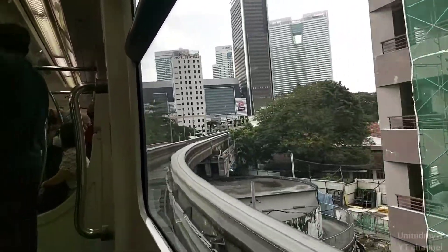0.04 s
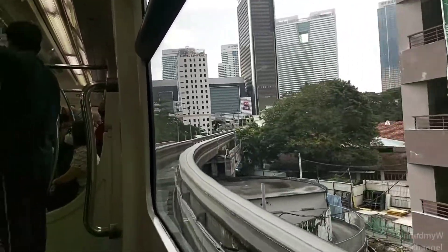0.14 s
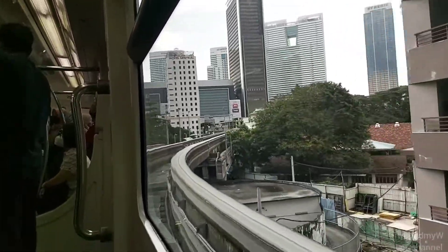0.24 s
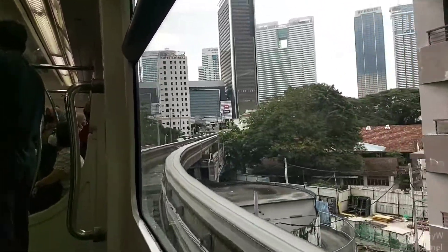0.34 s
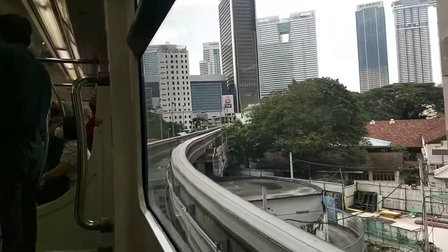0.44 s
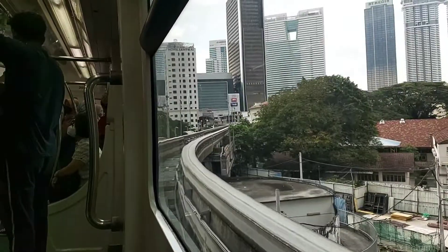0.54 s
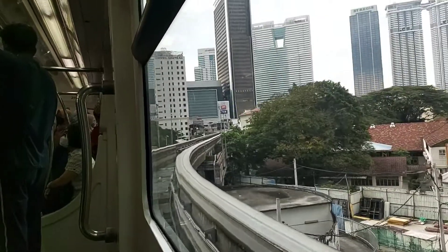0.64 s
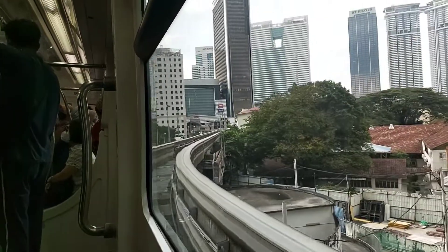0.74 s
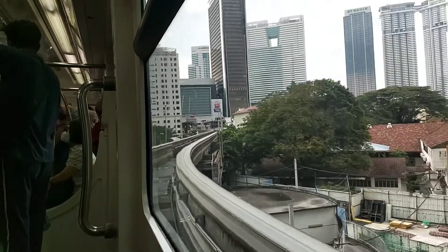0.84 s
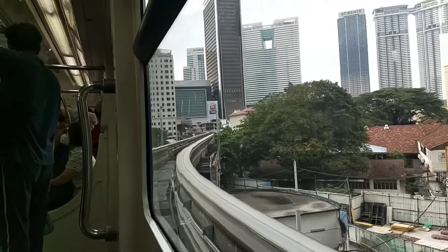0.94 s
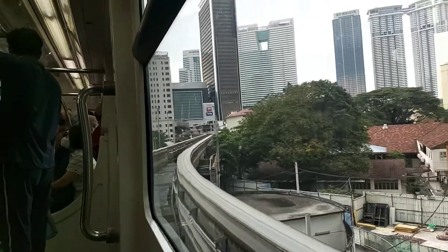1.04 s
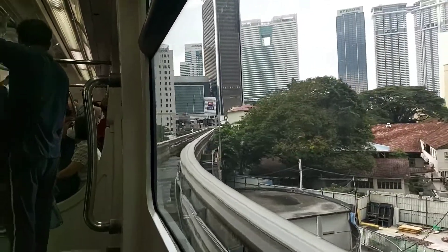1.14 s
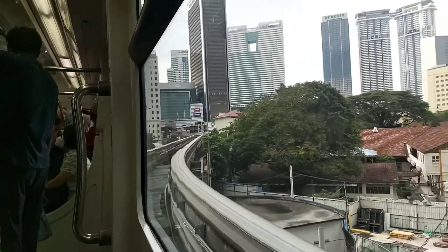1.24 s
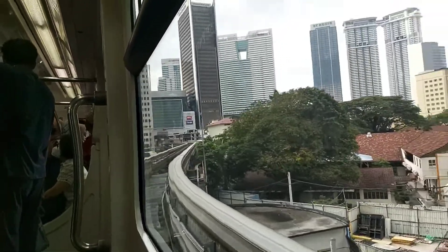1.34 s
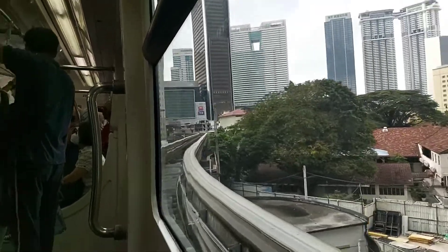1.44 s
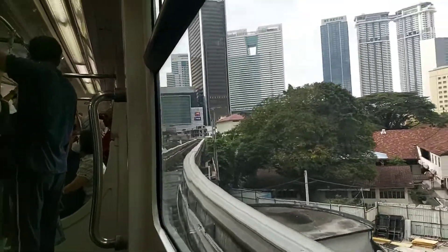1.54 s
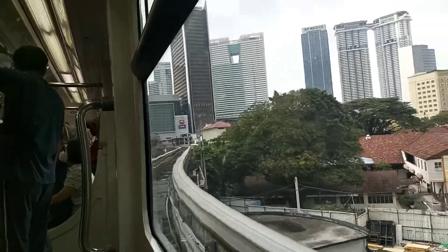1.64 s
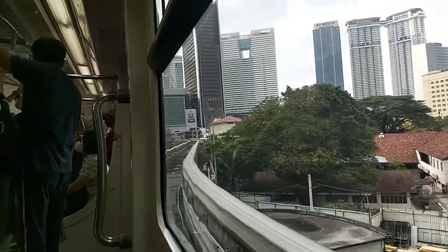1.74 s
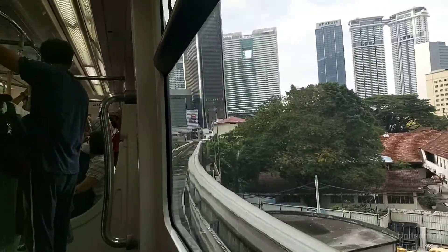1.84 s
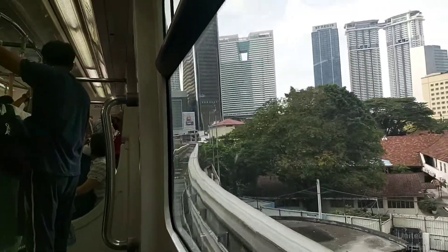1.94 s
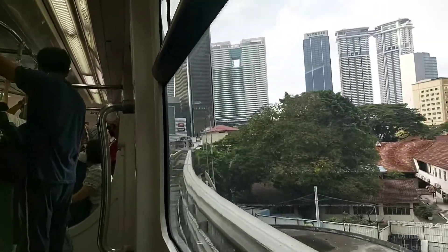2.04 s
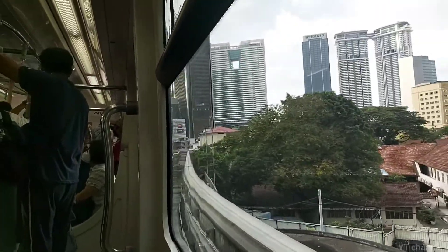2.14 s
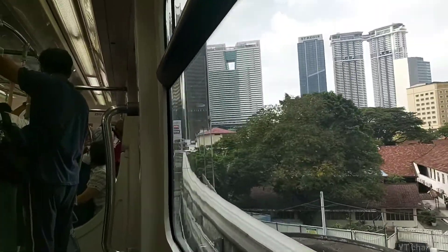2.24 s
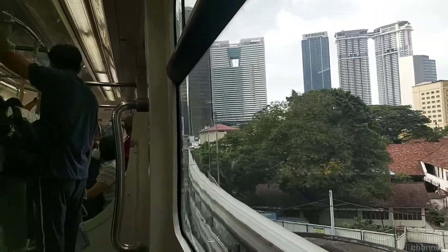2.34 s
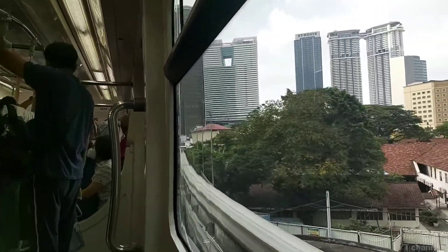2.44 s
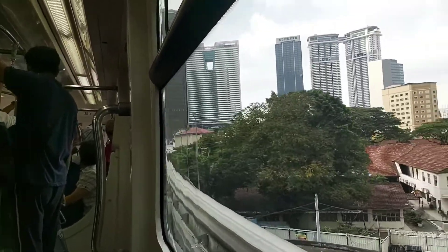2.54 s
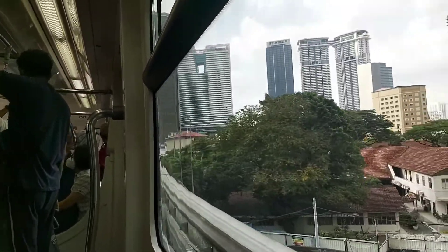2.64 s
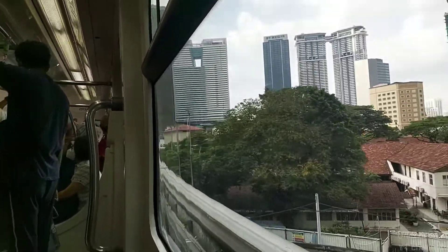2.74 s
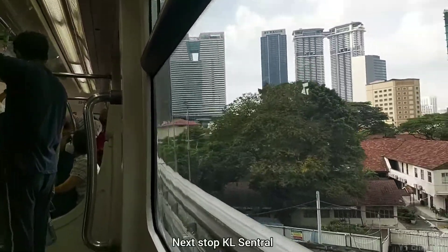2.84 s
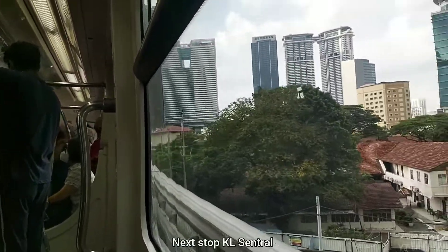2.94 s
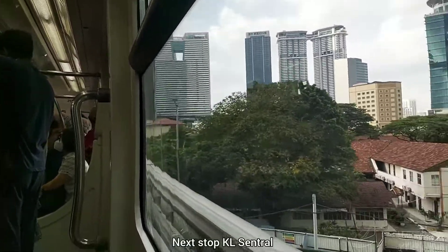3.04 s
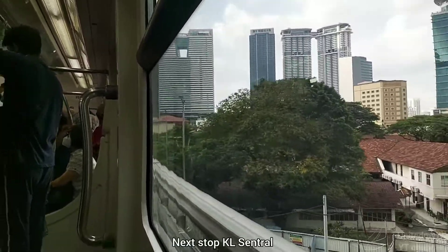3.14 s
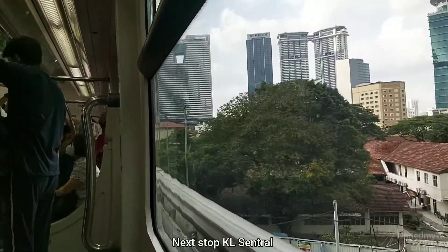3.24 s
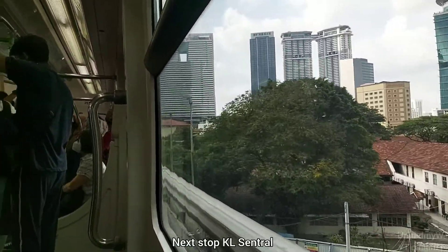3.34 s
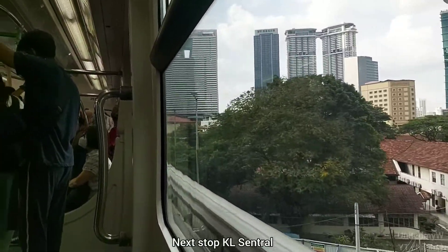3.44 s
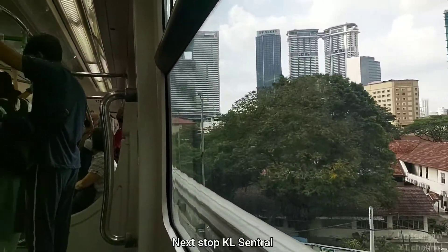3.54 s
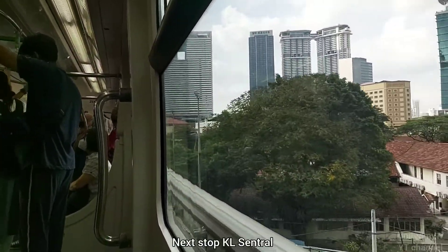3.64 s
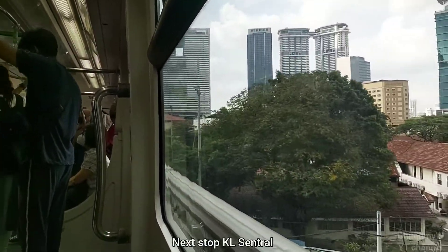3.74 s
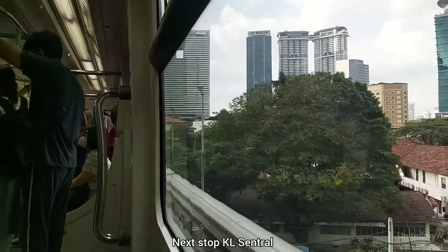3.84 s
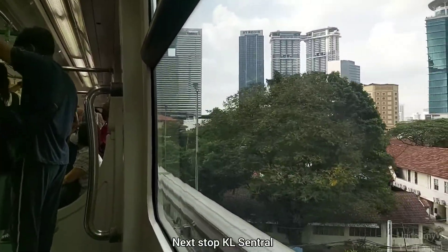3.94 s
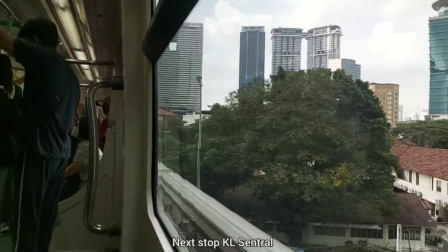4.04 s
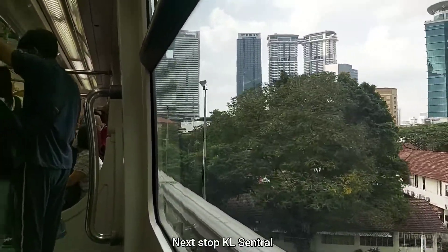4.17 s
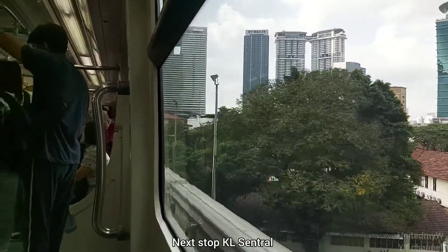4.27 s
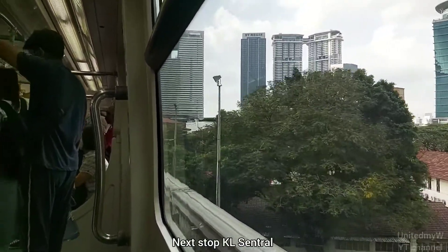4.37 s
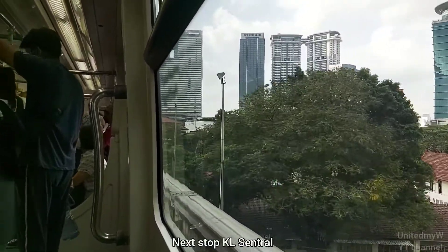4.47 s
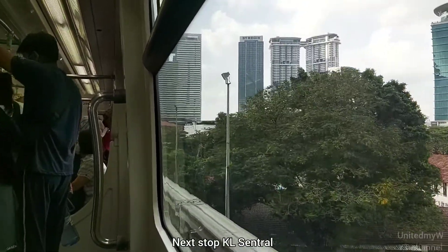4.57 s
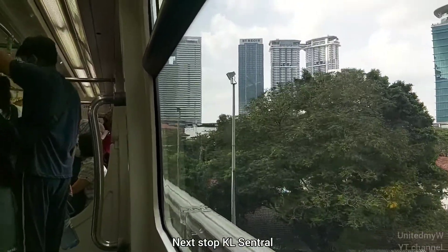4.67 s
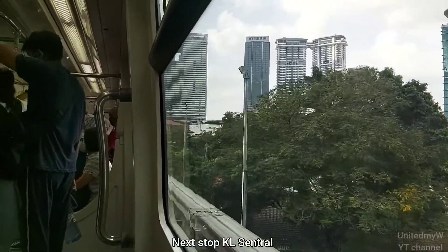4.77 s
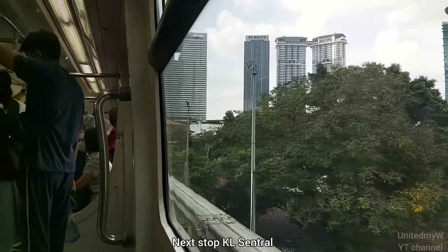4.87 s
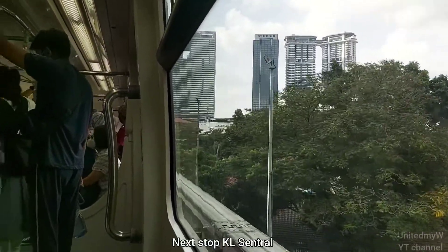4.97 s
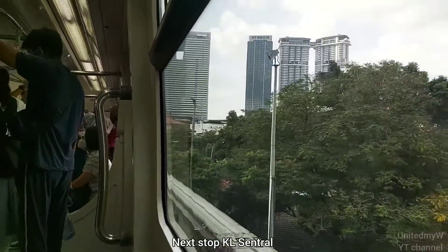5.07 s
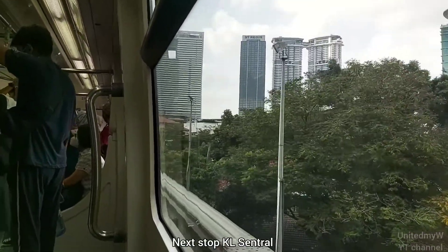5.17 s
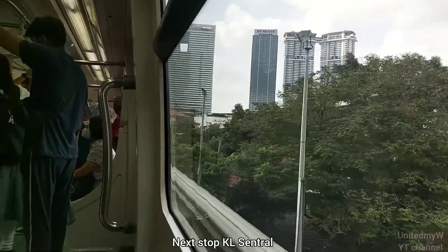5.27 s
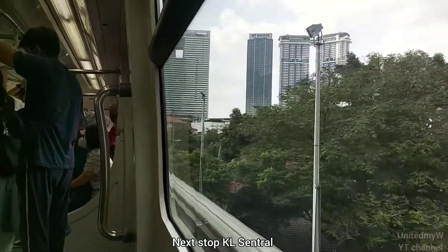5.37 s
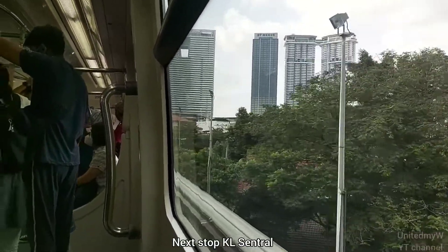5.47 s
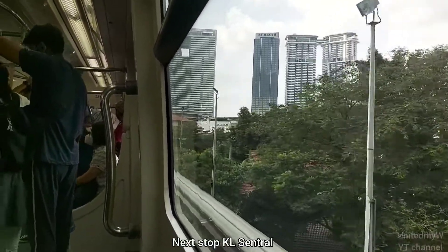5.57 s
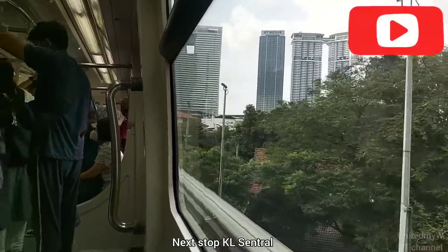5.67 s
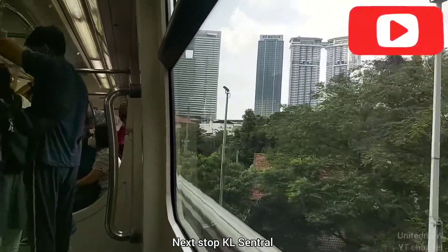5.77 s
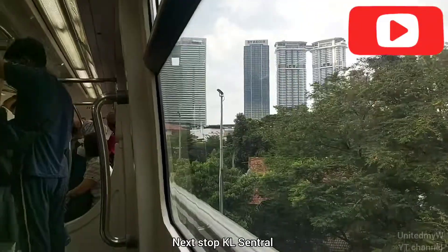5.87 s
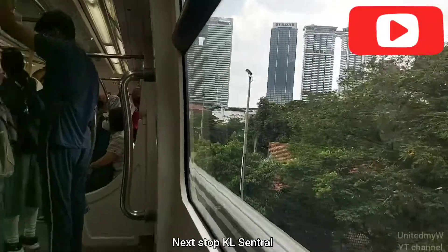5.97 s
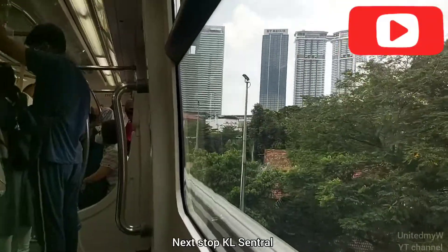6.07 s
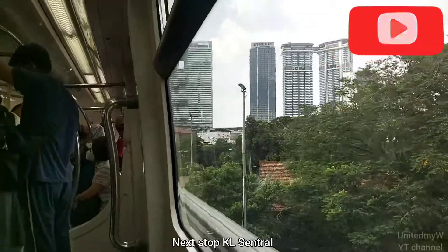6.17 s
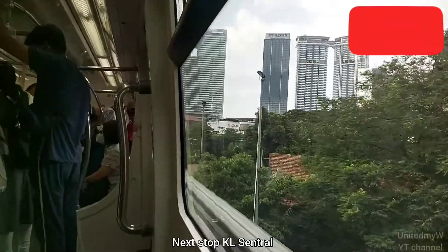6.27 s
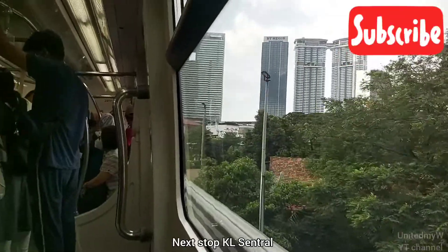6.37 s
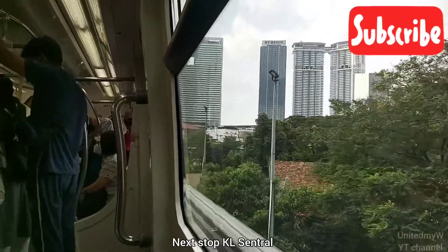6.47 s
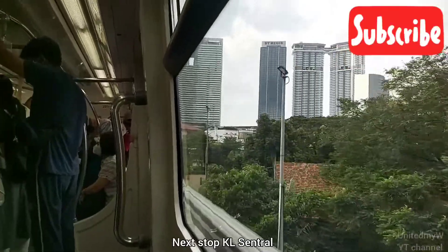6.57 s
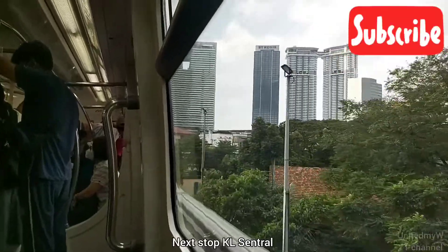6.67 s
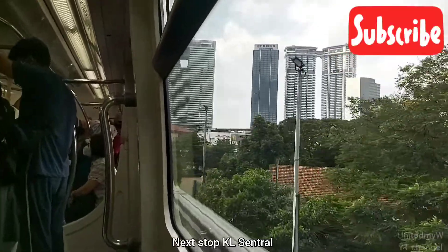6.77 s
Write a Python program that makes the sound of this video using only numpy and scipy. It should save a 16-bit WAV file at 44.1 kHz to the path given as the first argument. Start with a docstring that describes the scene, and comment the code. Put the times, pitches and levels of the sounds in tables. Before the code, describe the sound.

Heavy low rumble inside a moving monorail carriage, a mid-pitched electric whine gliding downward, a boomy thud midway and a clattering jolt with clicks near the end.

```python
"""Inside a rubber-tyred monorail carriage that slows gently through a curve on its concrete beam.
Tyres excite the floor and wall panels as shaped noise under a wide roar; the drive's gear mesh whines
as a modulated tone, its pitch sinking with the speed. The collector shoes hiss and scrape in noise swells.
The body booms over bumps and rings at joints, its panels drone, guide tyres scuff and squeak,
a loose fitting ticks as decaying modes, and fans and electrics hum in narrow bands."""
import sys
import numpy as np
from scipy import signal
from scipy.fft import rfft, irfft, next_fast_len
from scipy.io import wavfile
from scipy.ndimage import uniform_filter1d

SR = 44100
rng = np.random.default_rng(int(sys.argv[2]) if len(sys.argv) > 2 else 0)


def int16_out(signal):
    """Quantize to a 16-bit WAV file."""
    q = np.round(np.clip(np.atleast_2d(signal).T, -1, 1) * 32767)
    wavfile.write(sys.argv[1], SR, q.astype(np.int16))


N = 300321
TIME = np.arange(N) / SR
PADDED = next_fast_len(N, True)
BINS = np.fft.rfftfreq(PADDED, 1 / SR)

# gear mesh of the drive, sinking with the speed: (time [s], pitch [Hz])
MESH_HZ = [(0, 651), (.45, 649), (.9, 642), (1.5, 638.5), (2.1, 634), (2.6, 636), (3, 634), (3.5, 620),
           (4, 609.5), (4.6, 597), (5, 588.7), (5.75, 574), (6.3, 564), (6.81, 555.5)]
# the shoes are pressed against the rail and scrape: (time [s], level [dB], length [s])
SHOE_PRESSES = [(0.005, -50.5, 0.076), (0.361, -58, 0.09), (0.902, -56, 0.14), (1.534, -56.5, 0.08),
                (1.797, -62.5, 0.25), (1.967, -51.5, 0.093), (2.26, -55, 0.14), (2.4, -55, 0.17),
                (2.72, -53.5, 0.18), (3.096, -58.5, 0.24), (5.781, -55.5, 0.085), (5.842, -51, 0.046),
                (5.902, -55.5, 0.05), (6.24, -58.5, 0.091)]
# colour of the scrape: (frequency [Hz], relative power per Hz [dB])
SCRAPE_SPECTRUM = [(500, -47), (1200, 3), (2000, 1.5), (2500, -1.5), (3300, -9.5), (4500, -10.5),
                   (6000, -10), (7300, -12.5), (8200, -19.5), (10000, -17), (12400, -18.5), (14000, -24),
                   (15500, -25)]
PRESS_RISE = 0.41  # share of a press spent building up
SCRAPE_DB = 18  # gain of the scrape over the level of a press


def gain_of(db):
    """Level law: decibels to amplitude ratio."""
    return 10 ** (np.asarray(db) / 20)


def evened(x):
    """Normalisation: scales to rms 1."""
    return x / np.sqrt(np.mean(abs(x) ** 2) + 1e-20)


def curve(rows):
    """Linear interpolation: a control curve at every sample."""
    return np.interp(TIME, *np.transpose(rows))


def read(points, hz):
    """Logarithmic frequency scale: interpolates a spectrum table at these frequencies."""
    table_hz, value = np.transpose(points)
    return np.interp(np.log(hz + 1), np.log(table_hz + 1), value)


def drift(hz):
    """Low-pass noise: slow chance of rms 1, changing up to about hz times a second."""
    spectrum = rfft(rng.standard_normal(PADDED)) * np.exp(-(BINS / hz) ** 2)
    return evened(irfft(spectrum, PADDED)[:N])


def arches(rows, rise_share):
    """Incoherent addition: rounded swells, building for a share of their length, add in power."""
    each = []
    for s, db, length in rows:
        side_s = length * np.where(TIME < s, rise_share, 1 - rise_share)
        each.append(gain_of(db) * np.exp(-((TIME - s) / side_s) ** 2))
    return np.linalg.norm(each, axis=0)


def swells(rows):
    """Excitation and decay: each contact builds up along half a bell, then dies away exponentially."""
    total = np.zeros(N)
    for s, db, rise, decay in rows:
        fall = np.where(TIME < s, ((TIME - s) / rise) ** 2, (TIME - s) / decay)
        total += gain_of(db) * np.exp(-fall)
    return total


def ports(hz):
    """Level difference between two microphone ports: left and right gains that keep the total power."""
    # (frequency [Hz], left minus right [dB])
    balance_db = [(40, -6.5), (110, -1), (300, -5), (620, -4), (780, -5.5), (1000, -3.5), (1500, -4),
                  (1850, -0.5), (3000, -3.5), (4200, 1.5), (5500, -1.5), (7100, 6), (8600, -5.5),
                  (12500, -2.5), (15000, 0.5)]
    tilt = gain_of(read(balance_db, hz) / 2)
    pair = np.array([tilt, 1 / tilt])
    return pair / np.sqrt((pair ** 2).mean(0))


def cabin_noise(spectrum):
    """Spatial coherence: noise alike at both ports in the bass, nearly unrelated in the upper treble."""
    # the two ports: (frequency [Hz], correlation [-1 to 1])
    coherence = [(40, 1), (90, 0.98), (160, 1), (320, 1), (400, 0.69), (650, 0.84), (800, 0.44),
                 (950, 0.11), (1100, -0.45), (1550, -0.3), (1900, 0.081), (2500, -0.087), (4000, 0.0061)]
    left, other = rfft(rng.standard_normal((2, PADDED)))
    same = np.clip(read(coherence, BINS), -1, 1)
    pair = np.array([left, same * left + np.sqrt(1 - same ** 2) * other])
    # the spectrum keeps falling beyond its first and last points
    skirts = (np.minimum(BINS / spectrum[0][0], 1) / np.maximum(BINS / spectrum[-1][0], 1)) ** 2
    colour = gain_of(read(spectrum, BINS)) * skirts
    return evened(irfft(pair * ports(BINS) * colour, PADDED)[:, :N])


def rippled(x, ripple_db=1.1, size=130):
    """Spectral ripple: a fixed, random fine colour of peaks and dips, unlike at each port."""
    ripple = evened(uniform_filter1d(rng.standard_normal((2, len(BINS))), size, 1))
    return irfft(rfft(x, PADDED) * evened(gain_of(ripple_db * ripple)), PADDED)[:, :N]


def mottle(x, depth_db, size, count):
    """Time-frequency modulation: short random patches of the spectrum swell and fade."""
    z = signal.stft(x, nperseg=size)[2]
    patches = rng.standard_normal(z.shape[1:])
    patches = uniform_filter1d(uniform_filter1d(patches, count, 0), count, 1)
    z = z * gain_of(depth_db * evened(patches))
    return evened(signal.istft(z, nperseg=size)[1][:, :N])


def rolling(level_db, shared_part, speed_power):
    """Speed law: the gain follows a power of the speed and a part of the shared rolling level."""
    # shared level of the rolling sound, dipping after the loud bumps: (time [s], level [dB])
    shared_db = [(0, 0.5), (2.46, 0.5), (2.53, -2.5), (2.7, 0.5), (2.93, -0.5), (3.1, -0.5), (3.5, -0.5),
                 (5.1, 1), (5.9, 1), (6.02, -3.5), (6.4, -4), (6.81, -4)]
    speed = curve(MESH_HZ) / MESH_HZ[0][1]  # relative to the start
    return gain_of(level_db + shared_part * curve(shared_db)) * speed ** speed_power


def tyres():
    """Structure-borne sound: rolling shakes the floor, booms in the panels and roars through the body."""
    # level of the floor's rumble: (time [s], relative level [dB])
    floor_db = [(0, 0), (1.3, -1.5), (2.2, -.5), (3.1, 0.5), (3.7, -1.5), (4.4, 0.5), (5.4, -1.5), (6.3, 2),
                (6.81, -1.5)]
    # level of the panels' boom, strongest where the curve is tightest: (time [s], relative level [dB])
    wall_db = [(0, 0.47), (1.15, -0.35), (1.6, 1.2), (2.3, 0.6), (3, -1.4), (3.7, -1.7), (4.5, -0.18),
               (5.4, -0.8), (6.81, 0.31)]
    # floor shaken by the tyres: (frequency [Hz], relative power per Hz [dB])
    floor_spectrum = [(12, -39), (22, -29), (34, -5), (45, -7), (60, -0.5), (96, 1), (135, 0.5),
                      (180, -8.5), (260, -17), (500, -75)]
    # the car heaves over uneven stretches: (time [s], level [dB], length [s])
    heave_events = [(1.95, -27.5, 0.21), (2.67, -27.5, 0.98), (5.06, -18.5, 0.23), (5.87, -14, 0.25)]
    # the deeper rumble of a heave: (frequency [Hz], relative power per Hz [dB])
    heave_spectrum = [(22, -26), (34, -7), (48, 1), (70, 4.5), (100, -2.5), (135, -1), (180, -2),
                      (260, -19.5)]
    # wall panels booming: (frequency [Hz], relative power per Hz [dB])
    panel_spectrum = [(100, -11.5), (175, -0.5), (215, -5.5), (250, -2.5), (283, -3.5), (305, -4),
                      (328, -1), (370, -9), (435, -12.5), (480, -9), (535, -15), (570, -11), (635, -9.5),
                      (675, -21.5), (800, -40.5), (1400, -78)]
    # rolling roar: (frequency [Hz], relative power per Hz [dB])
    roar_spectrum = [(400, -6), (720, 0), (900, -2.5), (1100, -4.5), (1350, -8.5), (1550, -13),
                     (1900, -10.5), (2400, -16), (2900, -20), (4200, -29.5), (5500, -41.5), (7200, -42),
                     (9000, -41), (15000, -65)]

    floor = cabin_noise(floor_spectrum) * gain_of(curve(floor_db))
    floor = floor * rolling(level_db=-20.5, shared_part=0.26, speed_power=1.75)
    heave = cabin_noise(heave_spectrum) * arches(heave_events, rise_share=0.76)
    panels = cabin_noise(panel_spectrum) * gain_of(curve(wall_db))
    panels = panels * rolling(level_db=-23.0, shared_part=0.49, speed_power=0.9)
    roar = mottle(cabin_noise(roar_spectrum), depth_db=1.55, size=2048, count=6)
    roar = roar * rolling(level_db=-31.0, shared_part=0.96, speed_power=-.2)
    return floor + heave + panels + roar


def whine(flutter=0.08, loose_db=-47, wobble=0.3, housing_db=-14, housing_hz=634):
    """Modulation and resonance: wheels warble the mesh tone, shafts add sidebands, the housing rings."""
    # load on the drive, greatest as it brakes: (time [s], whine level [dB])
    load_db = [(0, -35), (.7, -33), (.86, -30.5), (1.05, -33), (1.25, -29.5), (1.9, -30), (2.15, -38),
               (2.68, -30.5), (2.8, -25), (3.02, -22.5), (3.35, -25), (3.65, -21.5), (4.6, -21), (5, -24),
               (5.5, -28), (5.95, -28), (6.3, -34.5), (6.5, -28.5), (6.81, -28)]
    # the whine dips briefly: (time [s], depth [share of its level])
    dips = [(1.72, 0.95), (2.77, 0.89), (2.865, 0.98), (3.21, .7), (3.33, 0.92), (3.445, 0.57),
            (3.575, 0.5), (3.735, .8), (4.09, 0.31), (4.215, 0.56), (4.345, 0.26), (4.455, 0.67),
            (4.66, 0.48), (4.835, 0.55), (5.11, .7), (5.25, 1), (5.42, 0.95), (5.56, 0.88), (5.88, 1),
            (6, 0.58)]
    dip_s = 0.016  # half-length of a dip
    # out-of-round wheels: (turning rate [share of mesh pitch], phase swing [rad])
    wheel_warble = [(.009, .5), (.0137, .25)]
    # shafts that make the whine beat: (turning rate [share of mesh pitch])
    rotor_shares = [.0406, .0554, .0666]
    # their sidebands before the housing's lift: (level [dB])
    rotor_db = [-18.5, -23, -21]
    # response of the gear housing: (frequency [Hz], gain [dB])
    housing_response = [(570, -8), (610, 4.5), (632, 4.5), (645, 14), (665, -9)]

    hz = curve(MESH_HZ)
    turns = np.cumsum(hz) / SR  # cycles of the mesh tone
    load = gain_of(curve(load_db) + .7 * drift(hz=7))  # the whine's level wavers at random
    unsteady = flutter + .5 * gain_of(loose_db) / load  # a light load leaves the tone less steady
    for s, depth in dips:
        load = load * (1 - depth * np.exp(-((TIME - s) / dip_s) ** 2))
    waver = 1 + unsteady * (drift(hz=17) + 1j * drift(hz=20))
    waver = waver / np.sqrt(1 + 2 * unsteady ** 2)

    warble = np.zeros(N)
    for share, swing in wheel_warble:
        wheel_angle = 2 * np.pi * (share * turns + rng.random()) + wobble * drift(hz=3.1)
        warble += swing * np.sin(wheel_angle)

    beats = np.ones(N, complex)
    for share, db in zip(rotor_shares, rotor_db):
        angle = 2 * np.pi * (share * turns + rng.random()) + wobble * drift(hz=2.8)
        for side in (-1, 1):  # lower and upper sideband
            lift_db = read(housing_response, hz * (1 + side * share)) - read(housing_response, hz)
            beats += gain_of(db + lift_db) * np.exp(1j * side * angle)

    mesh = evened((waver * beats * np.exp(1j * (2 * np.pi * turns + warble))).real)
    ringing = drift(hz=12.0) + 1j * drift(hz=7.7)
    housing = evened((np.exp(2j * np.pi * housing_hz * TIME) * ringing).real)
    return ports(np.array([housing_hz])) * load * (mesh + gain_of(housing_db) * housing)


def shoes():
    """Sliding friction: light contact hisses smoothly; pressed harder, the shoes add a mottled scrape."""
    # shoes sliding on the rail: (frequency [Hz], relative power per Hz [dB])
    hiss_spectrum = [(500, -43), (1200, 2.5), (2000, -1.5), (2500, -11.5), (3300, -6), (4500, -8.5),
                     (6000, -12.5), (7300, -12.5), (8200, -23), (10000, -19), (12400, -19), (14000, -24.5),
                     (15500, -26)]
    light = rolling(level_db=-46.0, shared_part=0.28, speed_power=-.2) * gain_of(1.13 * drift(hz=5.4))
    hiss = light * cabin_noise(hiss_spectrum)
    scrape = mottle(cabin_noise(SCRAPE_SPECTRUM), depth_db=2.5, size=512, count=5)
    return hiss + gain_of(SCRAPE_DB) * arches(SHOE_PRESSES, PRESS_RISE) * scrape


def crackle(count=320, level_db=-3, spread_db=2.5, decay_s=0.0038, low_hz=1500, high_hz=14000):
    """Granular impacts: grit under a pressed shoe snaps in tiny rings, more and louder under pressure."""
    press = arches(SHOE_PRESSES, PRESS_RISE)
    t, out = TIME[:SR // 40], np.zeros((2, N + SR))
    envelope = t / decay_s * np.exp(1 - 2 * t / decay_s)
    # the chance of a grain follows the pressure
    starts = np.searchsorted(np.cumsum(press) / press.sum(), rng.random(count))
    for start, (pitch, size, side) in zip(starts, rng.random((count, 3))):
        hz = low_hz * (high_hz / low_hz) ** pitch
        size_db = -spread_db * np.log(max(size, 1 / 20))
        db = SCRAPE_DB + level_db + read(SCRAPE_SPECTRUM, hz) + size_db
        grain = gain_of(db) * press[start] * envelope * np.sin(2 * np.pi * hz * t)
        out[:, start:start + len(t)] += 2 * np.sqrt([[side], [1 - side]]) * grain
    return out[:, :N]


def body_booms():
    """Forced vibration: bumps in the beam make the whole body boom as low noise."""
    # bumps in the beam: (time [s], level [dB], rise [s], decay [s])
    bumps = [(.24, -24, 0.091, 0.061), (2.492, -12.5, 0.037, 0.029), (5.06, -22.5, 0.07, 0.063),
             (5.83, -15.5, 0.046, 0.03), (5.918, -17.5, 0.016, 0.045), (6.28, -20, 0.035, 0.054)]
    # the body's boom: (frequency [Hz], relative power per Hz [dB])
    boom_spectrum = [(40, -25), (65, -24), (110, -22), (145, 4), (180, 4), (215, -3), (250, 3.5), (325, 3),
                     (365, -9), (480, -10.5), (800, -73)]
    return cabin_noise(boom_spectrum) * swells(bumps)


def jolts(attack_s=0.0018, scatter_db=2):
    """Modal excitation: a tyre drops over a joint and knocks the body's modes in a varying mix."""
    # sharp jolts at joints in the beam: (time [s], level [dB], brightness [dB per octave])
    joints = [(0.079, -20.5, 7), (0.321, -21, -5), (0.937, -18, -1.5), (1.008, -21.5, -5),
              (1.329, -19.5, 2.5), (1.938, -25, 6), (2.48, -32, 2), (2.685, -25.5, -9), (5.798, -15.5, 1),
              (5.83, -18, -1), (5.85, -20, 3), (5.899, -25, 0), (5.915, -19, 0), (5.941, -22, 6),
              (5.959, -23, -7)]
    # modes of the body: (frequency [Hz], level [dB], t60 [s])
    body_modes = [(71, -13.5, 0.089), (116, 7.5, 0.11), (146, 6, 0.1), (187, -4, 0.1), (250, -4, 0.12),
                  (291, 6, 0.085), (331, 0.5, 0.072), (485, -3, 0.056)]
    t, out = TIME[:SR // 4], np.zeros((2, N))
    hz, mode_db, t60 = np.transpose(body_modes)
    for s, db, tilt in joints:
        tilt_db = tilt * np.log2(hz / hz.mean())
        sizes = gain_of(db + mode_db + tilt_db + scatter_db * rng.standard_normal(len(hz)))
        tones = np.sin(2 * np.pi * (hz[:, None] * t + rng.random((len(hz), 1))))
        rings = gain_of(-60 * t / t60[:, None]) * tones
        start = round(s * SR)
        out[:, start:start + len(t)] += (ports(hz) * sizes) @ rings * (1 - np.exp(-t / attack_s))
    return out


def drones():
    """Panel resonance: single panels swell and fade at their own pitch and time."""
    # (time [s], pitch [Hz], level [dB], half-length [s])
    panel_tones = [(0.22, 281, -18.5, 0.028), (1.771, 167.6, -13, 0.024), (2.504, 322, -17, 0.053),
                   (2.492, 160.4, -14.5, 0.026), (2.61, 119, -18, 0.064), (2.792, 152, -20, 0.051),
                   (3.356, 284.5, -26.5, 0.26), (5.01, 101, -15, .03), (5.103, 87, -21.5, 0.054),
                   (5.835, 180, -18.5, 0.028)]
    out = np.zeros((2, N))
    for s, hz, db, half in panel_tones:
        tone = evened(np.sin(2 * np.pi * (hz * TIME + rng.random())))
        out += ports(np.array([hz])) * tone * gain_of(db) * np.exp(-((TIME - s) / half) ** 2)
    return out


def guide_tyre_scuffs():
    """Friction noise: the guide tyres scuff the beam in swells of mottled noise."""
    # (time [s], level [dB], rise [s], decay [s])
    scuff_events = [(1.975, -44, .02, .04), (2.265, -36, 0.028, .04), (2.72, -48, 0.034, .04),
                    (3.11, -38, 0.098, 0.045), (4.97, -35, 0.03, 0.04), (5.765, -29, 0.028, 0.071),
                    (5.838, -38, 0.0089, 0.026), (5.904, -39, 0.011, .035), (6.237, -31, 0.02, 0.018),
                    (6.28, -35, .05, 0.19)]
    # colour of a scuff: (frequency [Hz], relative power per Hz [dB])
    scuff_spectrum = [(500, -11), (950, 3), (1500, -1.5), (2300, -4.5), (3200, -10.5), (4400, -14),
                      (6500, -22), (9000, -45)]
    scuff = mottle(cabin_noise(scuff_spectrum), depth_db=0.5, size=256, count=5)
    return scuff * swells(scuff_events)


def squeaks():
    """Stick-slip: a sliding contact sticks and slips for a moment at a fuzzy pitch that may glide."""
    # brief squeaks of tyres and shoes in the curve: (time [s], pitch [Hz], level [dB],
    # half-length [s], width [share of the pitch], glide [octaves per s])
    squeak_events = [(0.2, 796, -30.5, 0.05, 0.05, 1), (1.19, 895, -31.5, 0.04, 0.035, 2),
                     (1.974, 1680, -37, 0.025, .03, 1), (1.987, 1984, -37.5, 0.04, .03, -1.5),
                     (2.705, 1930, -38, 0.016, .04, 3), (2.74, 2000, -38, .01, 0.052, 2.5),
                     (2.758, 1993, -40, 0.019, .05, 0), (2.758, 2450, -43, 0.02, 0.036, 0.5),
                     (3.056, 2370, -37, 0.012, .03, -0.5), (3.075, 6500, -48.5, 0.011, .04, -0.5),
                     (3.093, 792, -31, 0.055, 0.025, 0.5), (3.118, 4160, -44, .028, 0.18, 9.5),
                     (5.842, 2330, -36, .016, 0.03, 0.5)]
    out, slip = np.zeros((2, N)), rfft(rng.standard_normal((2, SR)))
    for s, hz, db, half, spread, glide in squeak_events:
        start = max(round((s - 3 * half) * SR), 0)
        t = TIME[start:round((s + 3 * half) * SR)] - s
        # low-pass noise on a carrier widens the tone to a band
        fuzz = irfft(slip * np.exp(-(np.arange(slip.shape[1]) / (hz * spread)) ** 2), SR)
        fuzz = np.roll(fuzz, -start, 1)[:, :len(t)]
        shape = np.exp(-(t / half) ** 2)
        tone = fuzz * np.sin(2 * np.pi * np.cumsum(hz * 2 ** (glide * t)) / SR)
        squeak = evened(tone * shape) * np.sqrt(np.mean(shape ** 2))
        out[:, start:start + len(t)] += ports(np.array([hz])) * gain_of(db) * squeak
    return out


def ticks(crack_s=.0012, tail_db=-13, tail_s=.009, ring_db=-9, left_db=-6):
    """Impulse response: a bright crack, a brief metal ring and a scatter off near walls, to the right."""
    # ticks of a loose fitting: (time [s], level [dB])
    tick_events = [(2.641, -43.5), (5.805, -47), (5.833, -35), (5.8988, -38), (5.904, -49)]
    # modes of the fitting: (frequency [Hz], relative level [dB], t60 [s])
    fitting_modes = [(3620, 7, 0.06), (7100, 3.5, 0.075), (11200, -12.5, .03), (14400, -3, .05)]
    t, out = TIME[:SR // 8], np.zeros((2, N))
    ring = sum(gain_of(db - 60 * t / t60) * np.sin(2 * np.pi * hz * t) for hz, db, t60 in fitting_modes)
    shape = np.exp(-t / crack_s) + gain_of(tail_db) * np.exp(-t / tail_s)
    for s, db in tick_events:
        start = round(s * SR)
        bright = np.diff(rng.standard_normal((2, len(t) + 1))) / 2  # differencing favours the treble
        out[:, start:start + len(t)] += gain_of(db) * (shape * bright + gain_of(ring_db) * ring)
    return out * np.array([[gain_of(left_db)], [1]])


def hums(depth=0.89):
    """Narrow-band noise: tones of the fans and electrics waver in level and phase."""
    # (pitch [Hz])
    hum_hz = [96, 283, 389, 2088, 2462]
    # for each pitch: (level [dB], width [Hz])
    hum_levels = [(-34.5, 4.8), (-40.5, 8.6), (-39.5, 8.5), (-58.5, 2.4), (-59.5, 4.9)]
    out = np.zeros((2, N))
    for hz, (db, width) in zip(hum_hz, hum_levels):
        waver = 1 + depth * (drift(width) + 1j * drift(width))
        tone = evened((waver * np.exp(2j * np.pi * hz * TIME)).real)
        out += ports(np.array([hz])) * gain_of(db) * tone
    return out


def scene():
    """Superposition: the sum of everything heard beside the window."""
    running = tyres() + whine() + rippled(shoes()) + crackle()
    impacts = body_booms() + jolts() + drones()
    return running + impacts + guide_tyre_scuffs() + squeaks() + ticks() + hums()


def record(dry):
    """Band limiting and soft saturation: thins the lowest bass, rounds high peaks, fades both ends."""
    dry = signal.sosfilt(signal.butter(2, 20, "high", fs=SR, output="sos"), dry)
    knee, headroom = .7, .25  # amplitudes: where rounding starts, and the most that is added above it
    clean = np.clip(dry, -knee, knee)
    dry = clean + headroom * np.tanh((dry - clean) / headroom)
    dry = dry * signal.windows.tukey(N, 400 / N)  # 200 samples of fade at each end
    band_limit = signal.firwin(1023, 15740, window=("kaiser", 9), fs=SR)  # steep edge, Hz
    return signal.oaconvolve(dry, band_limit[None], "same")


dry = scene()
out = record(dry)
int16_out(out)
```